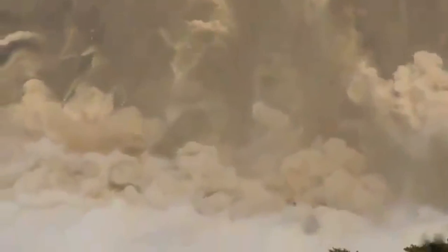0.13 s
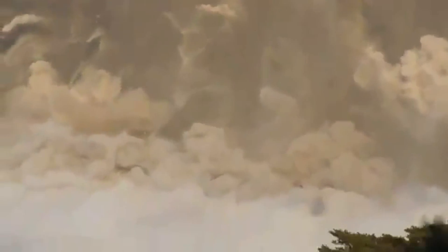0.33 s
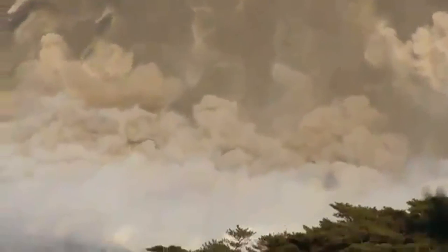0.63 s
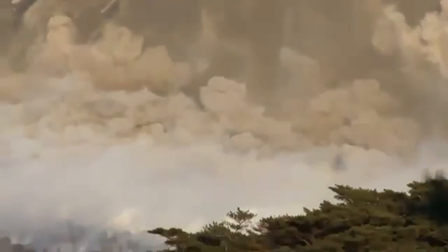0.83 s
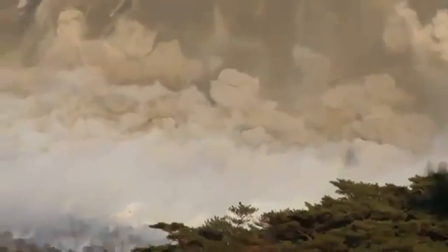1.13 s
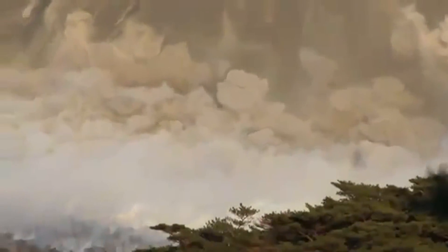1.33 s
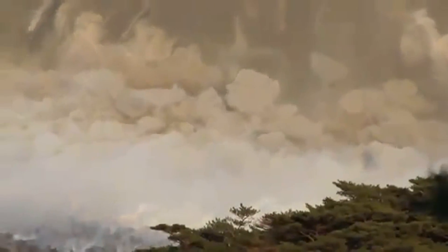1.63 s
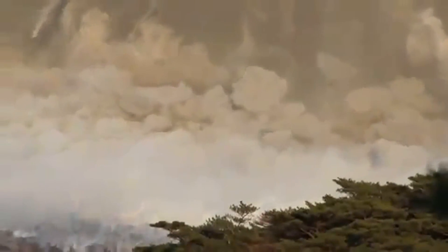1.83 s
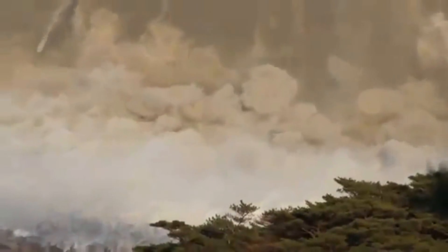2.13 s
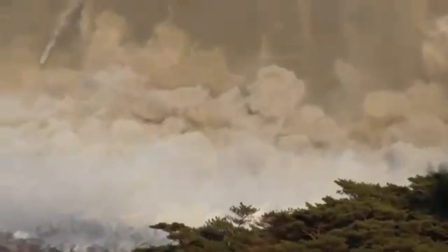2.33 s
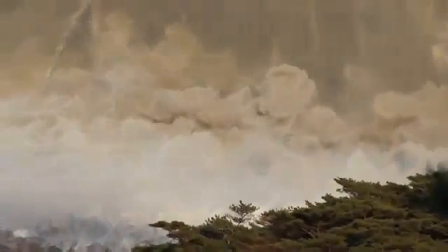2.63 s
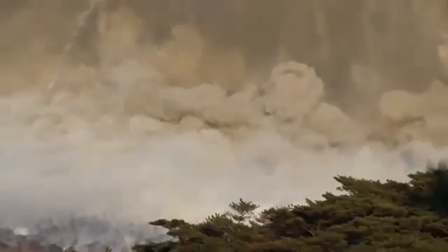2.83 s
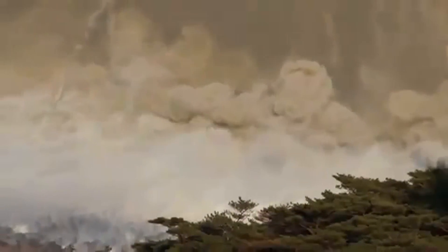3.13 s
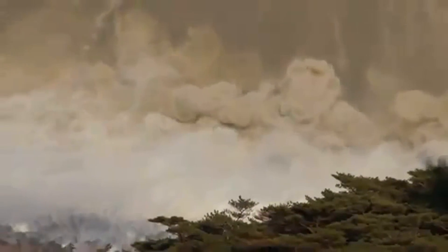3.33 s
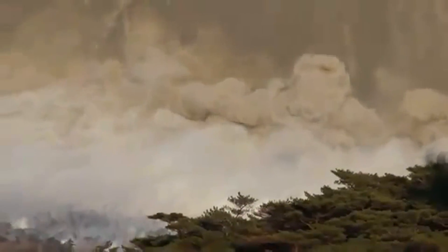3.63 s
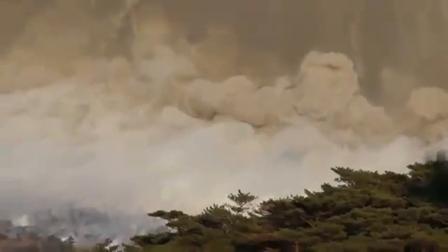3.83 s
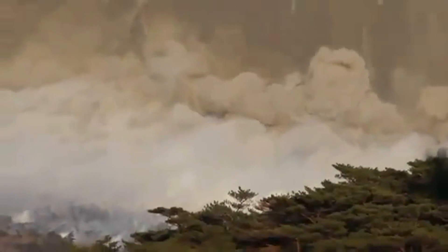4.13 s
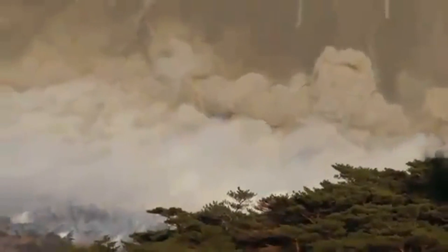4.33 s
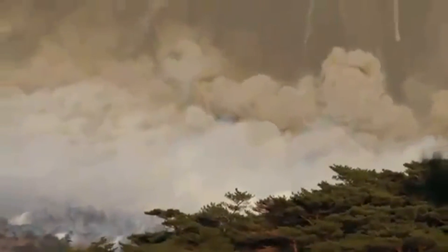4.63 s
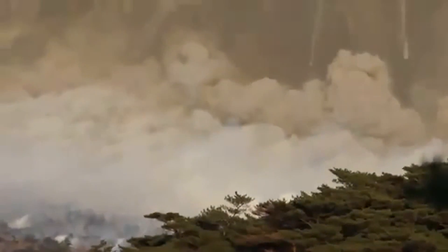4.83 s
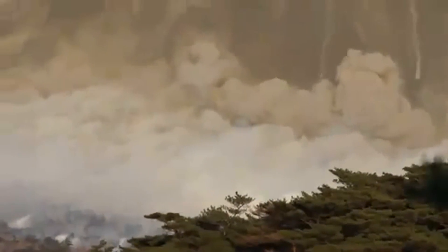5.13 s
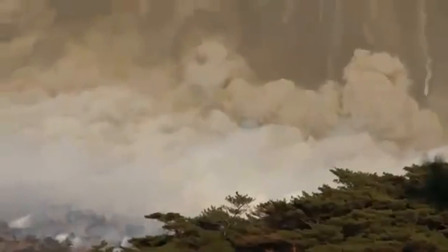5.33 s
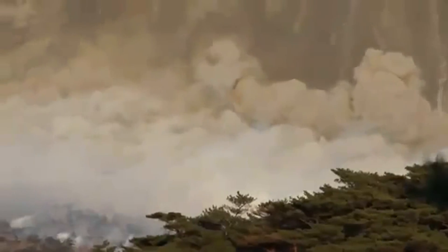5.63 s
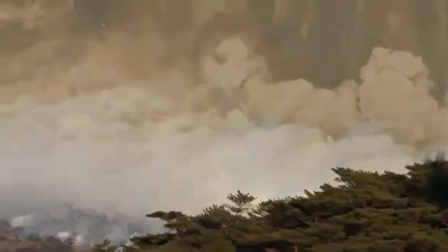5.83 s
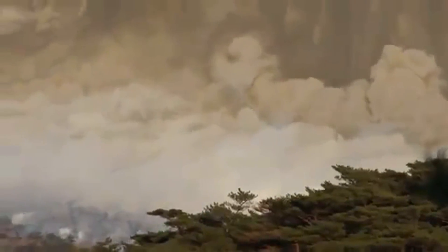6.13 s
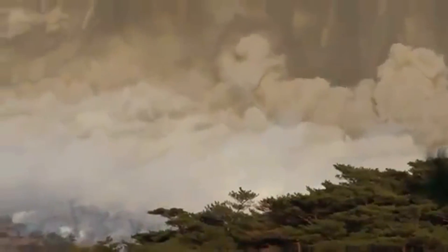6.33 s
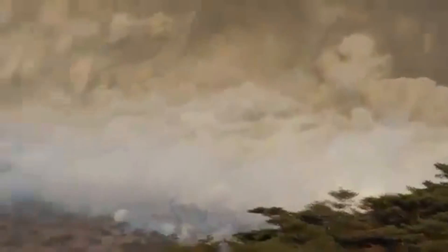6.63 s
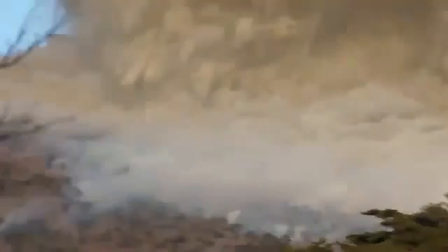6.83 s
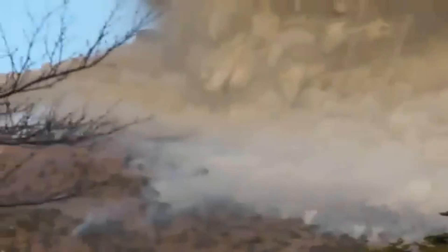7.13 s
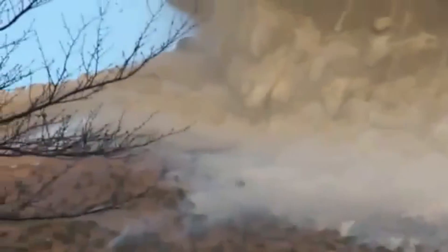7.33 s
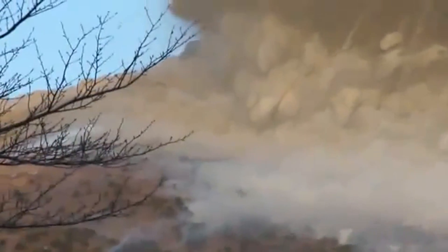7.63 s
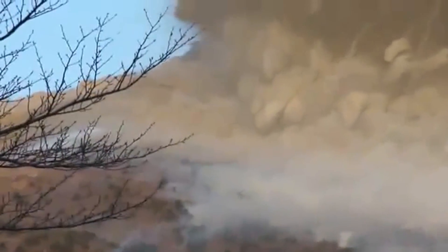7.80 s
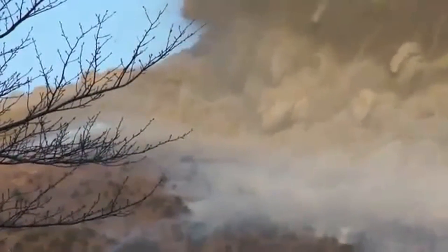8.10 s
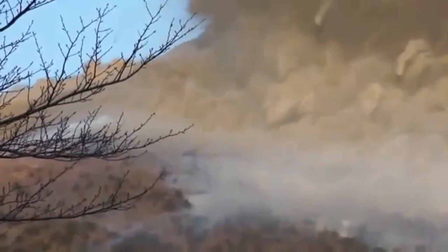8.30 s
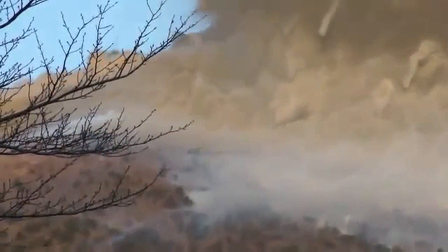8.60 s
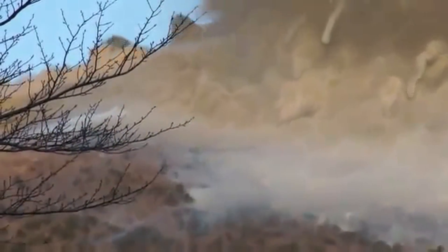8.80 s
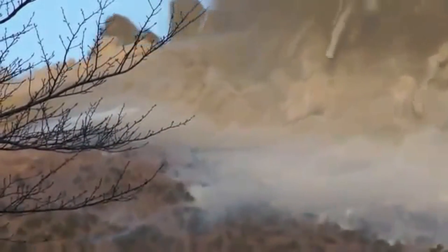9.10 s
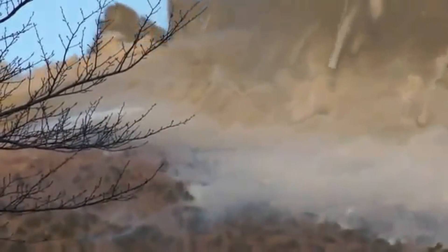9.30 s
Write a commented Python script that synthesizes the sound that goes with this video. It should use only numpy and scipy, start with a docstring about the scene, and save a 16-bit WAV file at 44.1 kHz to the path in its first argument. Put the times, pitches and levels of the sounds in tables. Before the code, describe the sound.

Continuous ash eruption roar over deep rumbling, with heavy wind thuds on a hand-held camera and late, scratchy, squeaking handling noise close up.

```python
"""Open ground far from a volcano: ash pours out with a steady roar while wind buffets a hand-held camera.
The eruption is coloured noise and dulled grains. Low thumps, some of them from the hand on the camera,
are short swells of tone. The wind is low noise plus slow pressure pushes; the gain control ducks
everything under the strongest. Late on, a hand drags over the camera body in squeaky stick-slip jerks,
then in one long rub: friction grains ring the shell and gliding sines make the squeaks."""
import sys
import numpy as np
from scipy import signal
from scipy.fft import rfft, irfft
from scipy.io import wavfile
from scipy.ndimage import uniform_filter1d

SR = 44100
rng = np.random.default_rng(int(sys.argv[2]) if len(sys.argv) > 2 else 0)


def waveform_to_disk(signal):
    """Save audio, clipped to [-1, 1], as 16-bit WAV at the path in sys.argv[1]."""
    frames = np.transpose(np.atleast_2d(signal))
    scaled = np.clip(frames, -1, 1) * 32767
    samples = np.round(scaled).astype(np.int16)
    wavfile.write(sys.argv[1], SR, samples)


N = 417186  # length in samples
TIME = np.arange(N) / SR  # s

# Broad rushing roar of the eruption: start_s, level_db
ROAR_LEVEL = [(0, -29.5), (.65, -31), (1.1, -29), (3.35, -29), (3.6, -30.5), (4.55, -30), (4.9, -33),
              (5.3, -31.5), (5.75, -34.5), (6.15, -31.5), (6.7, -29.5), (7.65, -30), (7.8, -30.5),
              (8.3, -31.5)]
# Spectrum of the roar, relative: freq_hz, density_db (per Hz)
ROAR_COLOUR = [(130, -8), (220, -2.5), (386, -2), (540, -6), (1260, -7.5), (1690, -12), (2640, -11),
               (2860, -12.5), (4140, -19.5), (5530, -18.5), (6290, -23), (7150, -22.5), (10200, -31),
               (13200, -71.5), (22000, -120)]
# Narrow resonances of the microphone housing: freq_hz, width_hz, lift_db
HOUSING_MODES = [(777, 27, 0.5), (2103, 55, 5.5), (2288, 43, 8.5), (2577, 25, 9.5), (2730, 140, 1.5),
                 (5365, 49, 8), (5730, 280, 4), (7900, 120, 1.5), (9860, 300, 3)]
# Force of the eruption, heard as its low rumble: start_s, level_db
RUMBLE_LEVEL = [(0, -22.5), (.42, -27.5), (.85, -23), (1.15, -26), (2.2, -25), (2.65, -27.5), (3.55, -30.5),
                (3.85, -28.5), (4.25, -30.5), (5.5, -31), (5.9, -34), (6.5, -30.5), (7.0, -32.5),
                (8.35, -29.5), (8.75, -36.5), (9.05, -31)]
# Spectrum of the rumble, relative: freq_hz, density_db (per Hz)
RUMBLE_COLOUR = [(38, -35), (65, -2), (146, -7), (220, -15.5), (300, -20), (420, -24), (700, -58.5),
                 (1200, -120)]
# Low thumps that stand out, some of them from the hand on the camera: centre_s, peak_db, pitch_hz
THUMPS = [(.619, -9.5, 68.5), (.813, -15, 150), (0.93, -17.5, 114), (2.294, -13.5, 60),
          (3.028, -17.5, 139.5), (3.823, -19, 122), (4.579, -12, 57.7), (5.374, -17, 62),
          (8.406, -27.5, 377), (9.059, -27.5, 122), (9.395, -31, 336)]
# Jerks and squeaky slides of the hand; spread is the sigma of the swell, squeak level is relative:
# centre_s, scrape_db, spread_s, squeak_db, pitch_hz, glide_octaves_per_s
SLIPS = [(6.936, -29, 0.0018, -22.5, 1510, -20), (8.382, -21.5, 0.0047, -17, 2366, 13),
         (8.398, -16.5, 0.0035, -20, 796, -10.5), (8.465, -34, 0.034, -26, 813, -0.5),
         (8.591, -30, 0.02, -20, 1590, 2.5), (8.619, -22, 0.012, -19.5, 950, -0.5),
         (8.725, -24.5, 0.0097, -17.5, 1760, -7.5), (8.827, -22.5, 0.0068, -19, 1810, -14.5),
         (8.927, -21.5, 0.009, -20, 1740, -13), (9.022, -24.5, 0.0088, -15.5, 1820, -4.5),
         (9.378, -20, 0.0091, -19, 2484, -5.5), (9.399, -32, 0.011, -20, 658, -3.5)]
# Rubbing strokes: start_s, length_s, level_db, growth_db (over the stroke), tilt_db (per octave)
STROKES = [(8.377, .022, -24, -3, 1.5), (8.397, 0.098, -24.5, 1, -2), (8.54, 0.088, -27.5, -1, 1),
           (8.687, 0.062, -26, 1, 1.2), (8.795, 0.047, -24, -1, 1), (8.894, 0.037, -24, -1, 0.5),
           (8.988, 0.04, -22, -2, 0.7), (9.039, .34, -27, 6.5, 2)]
# Spectrum of the rubbing, relative: freq_hz, density_db (per Hz)
RUB_COLOUR = [(150, -35), (330, -12.5), (600, -4.5), (850, -3.5), (1700, -4), (2600, -9.5), (3400, -16),
              (4500, -14), (6300, -23), (7100, -24.5), (10200, -28.5), (13000, -66)]
# Ringing of the camera body: freq_hz, width_hz, lift_db
BODY_MODES = [(386, 19, -6), (782, 23, 10), (840, 50, 6), (950, 25, 6), (1615, 43, 8), (1828, 31, 11),
              (2180, 100, 6.5), (2600, 82, 7), (2900, 50, 8.5), (3890, 160, 8), (4110, 180, 4.5),
              (6440, 260, 8.5)]
# Left-right likeness of the rubbing: freq_hz, likeness (1 = identical)
RUB_SAME = [(60, 0.63), (120, 0.83), (260, 0.89), (530, 0.98), (1100, 0.97), (2270, 1), (4700, 0.7),
            (9720, 0.1)]
# Left-right balance of the rubbing: freq_hz, left_minus_right_db
RUB_SIDE = [(60, -1), (110, -7), (190, 5), (330, 0), (580, 3), (1010, 2), (1780, 2.5), (3140, 4), (5520, 2),
            (9720, 12)]
# Strength of the wind on the microphone, relative: start_s, level_db
BUFFET_LEVEL = [(0, -16.5), (.3, -18.5), (.6, -16.5), (.85, -19), (1.5, -15.5), (1.9, -18.5), (2.3, -17),
                (3.3, -17.5), (3.75, -16), (4.2, -18), (5.7, -15), (6.1, -20), (7.65, -20), (8.15, -13.5),
                (8.55, -15), (8.75, -20.5), (9.45, -25.5)]
# Spectrum of the buffeting, relative: freq_hz, density_db (per Hz)
BUFFET_COLOUR = [(7.1, -44.5), (12, 4.5), (30, -6), (75, -23.5), (98, -40), (160, -120)]
# Single strong gusts, relative: centre_s, peak_db
GUSTS = [(0.254, 0), (.595, -2.5), (.685, -2.5), (1.62, 0.5), (1.918, -4.5), (2.43, -6), (2.64, -2),
         (3.11, -2), (3.56, 1), (4.232, 3), (4.644, -2), (4.809, -8.5), (4.955, -6), (5.435, -2),
         (5.503, 0.5), (5.719, -3.5), (7.45, 2), (7.76, -2), (7.847, 3.5), (8.191, -1.5)]
# Left-right likeness of the wind and eruption: freq_hz, likeness (1 = identical)
AIR_SAME = [(60, 0.74), (120, 0.97), (260, 0.94), (530, 0.83), (1100, 0.7), (2270, 0.79), (4700, 0.65),
            (9720, 0.69)]
# Left-right balance of the wind and eruption: freq_hz, left_minus_right_db
AIR_SIDE = [(60, -0.5), (110, 1), (190, 2), (330, 0), (580, 3), (1010, 3.5), (1780, 3.5), (3140, 4.0),
            (5520, 2.0), (9720, 0.5)]


def roar(crackle_db=-9.0, darkening=0.039):
    """A churning rush with fine crackle, darker under a strong rumble, coloured by the microphone housing."""
    crackle = grains(per_s=1500, spread_db=1.5)
    drive = rng.standard_normal((2, N)) + gain_of(crackle_db) * crackle
    rush = colour(drive, ROAR_COLOUR, AIR_SAME, AIR_SIDE, HOUSING_MODES)
    force_db = follow(RUMBLE_LEVEL, TIME)
    tilt_db = -darkening * (force_db - force_db.mean())
    rush = churn(rush, tilt_db, patch_db=1.05, flicker_db=0.5)
    return rush * gain_of(follow(ROAR_LEVEL, TIME))


def rumble():
    """Countless overlapping thuds of the ash column, dulled by distance."""
    thuds = colour(grains(per_s=1500, spread_db=2.0), RUMBLE_COLOUR, AIR_SAME, AIR_SIDE)
    return steadied(thuds, seconds=0.23) * gain_of(follow(RUMBLE_LEVEL, TIME))


def thumps(spread_s=0.016):
    """Each thump is a brief burst of tone that swells and dies at once."""
    out = np.zeros(N)
    phases = rng.random(len(THUMPS))  # turns
    for (centre_s, peak_db, pitch_hz), phase in zip(THUMPS, phases):
        near = abs(TIME - centre_s) < 4 * spread_s
        t = TIME[near] - centre_s
        swell = np.exp(-(t / spread_s) ** 2 / 2)
        out[near] += gain_of(peak_db) * swell * np.sin(2 * np.pi * (pitch_hz * t + phase))
    return out


def hand(squeak_trim_db=-3.0, waver=0.051):
    """Friction grains ring the camera body; each jerk swells the scrape and lets the skin squeak briefly."""
    power, tilt_db = strokes()
    squeaks = np.zeros(N)
    for centre_s, scrape_db, spread_s, squeak_db, pitch_hz, glide in SLIPS:
        near = abs(TIME - centre_s) < 4 * spread_s
        t = TIME[near] - centre_s
        swell = np.exp(-(t / spread_s) ** 2 / 2)
        power[near] += gain_of(scrape_db) ** 2 * swell
        unsteady = 1 + waver * evened(uniform_filter1d(rng.standard_normal(len(t)), size=60))
        turns = np.cumsum(pitch_hz * 2 ** (glide * t) * unsteady) / SR
        squeaks[near] += gain_of(squeak_db) * swell * np.sqrt(2) * np.sin(2 * np.pi * turns)
    friction = ring(grains(per_s=4500, spread_db=0.8), ring_db=-3.5, t60=0.1)
    body = colour(friction, RUB_COLOUR, RUB_SAME, RUB_SIDE, BODY_MODES)
    body = steadied(body, seconds=0.021)
    scrape = churn(body, tilt_db, patch_db=2.2, flicker_db=0.0) * np.sqrt(power)
    squeak_side_db = np.array([[1.2], [-1.2]])  # a little to the left
    return scrape + squeaks * gain_of(squeak_trim_db + squeak_side_db)


def strokes(grip_s=0.0046, release_db_per_s=172, thinning=0.081):
    """Power and tilt of the rubbing: a stroke grips, changes in level as it slides, lets go and thins out."""
    power, tilt = np.zeros(N), np.zeros(N)
    for start_s, length_s, level_db, growth_db, tilt_db in STROKES:
        t = TIME - start_s
        grip = np.clip(t / grip_s, 0, 1)
        slide_db = growth_db * np.clip(t / length_s, 0, 1)
        fade_db = release_db_per_s * np.maximum(t - length_s, 0)
        part = (grip * gain_of(level_db + slide_db - fade_db)) ** 2
        power += part
        # extra dB per octave for each dB faded, up to 20 dB of fade
        tilt += part * (tilt_db + thinning * np.minimum(fade_db, 20))
    return power, tilt / (power + 1e-12)  # tilt averaged by power


def ring(pair, ring_db, t60):
    """The many small, close modes of a plastic shell: a brief dense tail that combs the treble."""
    t = np.arange(SR // 10) / SR
    b, a = signal.butter(1, 2500, "high", fs=SR)
    tail = signal.lfilter(b, a, rng.standard_normal(len(t))) * gain_of(-60 * t / t60)
    rung = signal.oaconvolve(pair, tail[None] / np.linalg.norm(tail), axes=1)[:, :N]
    return evened(pair + gain_of(ring_db) * rung)


def wind(buffet_trim_db=3.5, gust_trim_db=-4.0, gust_s=0.029):
    """Eddies shake the microphone; a strong gust is one slow push with a suction on either side."""
    eddies = colour(rng.standard_normal((2, N)), BUFFET_COLOUR, AIR_SAME, AIR_SIDE)
    out = steadied(eddies, seconds=0.15) * gain_of(follow(BUFFET_LEVEL, TIME) + buffet_trim_db)
    for centre_s, peak_db in GUSTS:
        u = np.minimum(((TIME - centre_s) / gust_s) ** 2, 100)
        out = out + gain_of(peak_db + gust_trim_db) * (1 - u) * np.exp(-u / 2)
    return out


def grains(per_s, spread_db):
    """Two trains of tiny clicks struck at the same random moments, a few of them large."""
    size = gain_of(spread_db * np.minimum(rng.exponential(1, N), 4))
    struck = rng.random(N) < per_s / SR
    return evened(size * struck * rng.standard_normal((2, N)))


def colour(pair, spectrum, same, side, peaks=()):
    """Two excitations become a coloured, partly alike stereo pair whose middle has rms 1."""
    hz = np.fft.rfftfreq(N, 1 / SR)
    db = read(spectrum, hz)
    for freq_hz, width_hz, lift_db in peaks:
        db = db + lift_db / (1 + (2 * (hz - freq_hz) / width_hz) ** 2)
    a, b = rfft(pair)
    likeness = np.clip(read(same, hz), -1, 1)
    lean_db = read(side, hz) / 2
    shared, apart = a * np.sqrt(1 + likeness), b * np.sqrt(1 - likeness)
    left = (shared + apart) * gain_of(lean_db)
    right = (shared - apart) * gain_of(-lean_db)
    out = irfft(np.array([left, right]) * gain_of(db), N)
    return out / out.mean(0).std()


def churn(pair, tilt_db, patch_db, flicker_db):
    """Tilts the spectrum (dB per octave), roughens it with drifting patches and flickers all bands together."""
    hz, t, z = signal.stft(pair, SR, nperseg=512, noverlap=384)
    patches = uniform_filter1d(rng.standard_normal((len(t), len(hz))), size=14, axis=0)  # along time
    patches = evened(uniform_filter1d(patches, size=7, axis=1))  # along frequency
    flicker = evened(uniform_filter1d(rng.standard_normal(len(t)), size=16))
    octaves = np.log2(np.clip(hz, 400, 8000) / 1600)  # the tilt pivots at 1600 Hz
    db = np.interp(t, TIME, tilt_db)[:, None] * octaves
    db = db + patch_db * patches + flicker_db * flicker[:, None]
    return signal.istft(z * gain_of(db.T), SR, nperseg=512, noverlap=384)[1][:, :N]


def steadied(pair, seconds):
    """Holds the level of a noise even over spans longer than the given time."""
    power = uniform_filter1d((pair ** 2).mean(0), max(int(seconds * SR), 2))
    return pair * np.sqrt(power.mean() / (abs(power) + 1e-12))


def gain_of(db):
    """Decibels to amplitude."""
    return 10 ** (np.asarray(db) / 20)


def evened(x):
    """Scales to rms 1."""
    return x / np.sqrt(np.mean(x ** 2) + 1e-20)


def read(points, hz):
    """A spectrum table, joined by lines on a log-frequency axis."""
    f, value = np.transpose(points)
    return np.interp(np.log(hz + 1), np.log(f + 1), value)


def follow(rows, t):
    """A curve table at the times t."""
    return np.interp(t, *np.transpose(rows))


def scene():
    """Eruption, thumps, hand and wind together."""
    return roar() + rumble() + thumps() + hand() + wind()


def record(dry, threshold_db=-6.0, slope=0.91, recovery_db_per_s=106.0, edge_hz=10350):
    """A fast gain control ducks everything under each pressure peak; then soft overload and the band limit."""
    peak_db = 20 * np.log10(abs(uniform_filter1d(dry, size=40, axis=1)).max(0) + 1e-9)
    fall = TIME * recovery_db_per_s
    held_db = np.maximum.accumulate(peak_db + fall) - fall  # jumps up at once, recovers steadily
    over_db = np.maximum(held_db - threshold_db, 0)
    ducked = dry / gain_of(slope * uniform_filter1d(over_db, size=200))
    rounded = ducked / (1 + (ducked / 0.9) ** 8) ** (1 / 8)
    lowpass = signal.firwin(801, edge_hz, window=("kaiser", 9), fs=SR)
    return signal.oaconvolve(rounded, lowpass[None], "same", axes=1)


dry = scene()
out = record(dry)
waveform_to_disk(out)
```